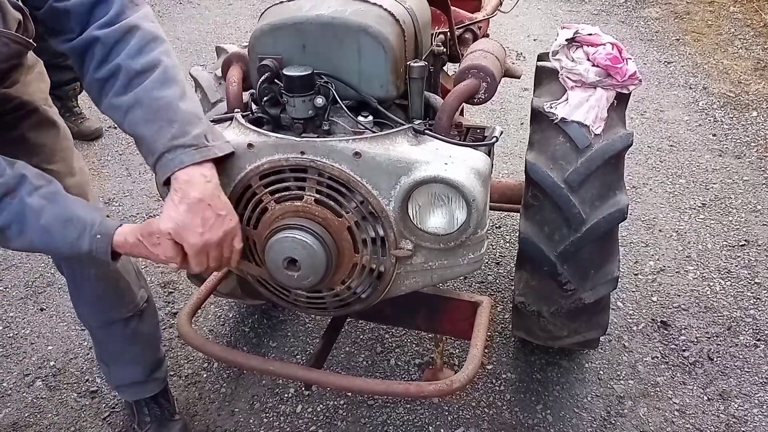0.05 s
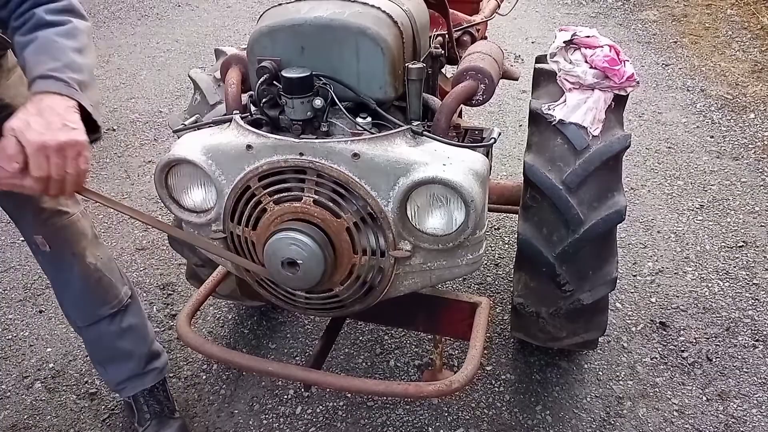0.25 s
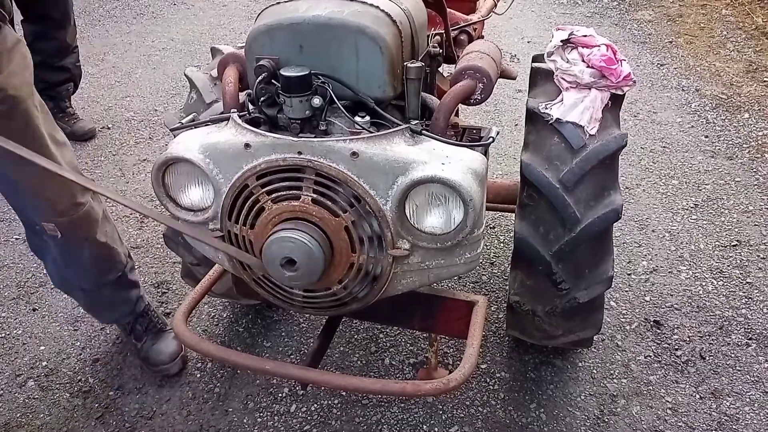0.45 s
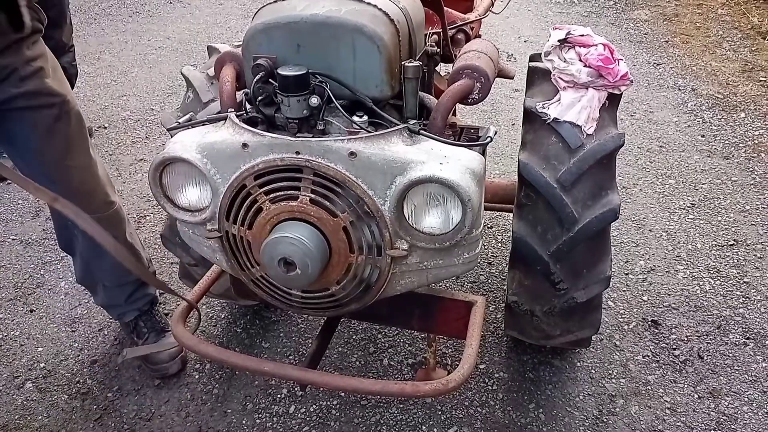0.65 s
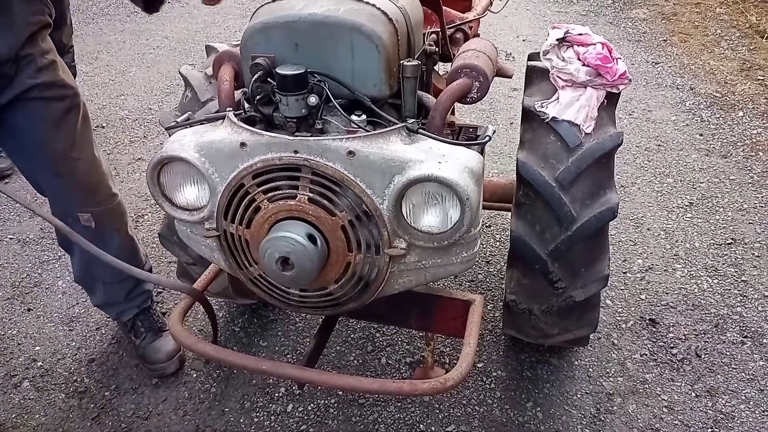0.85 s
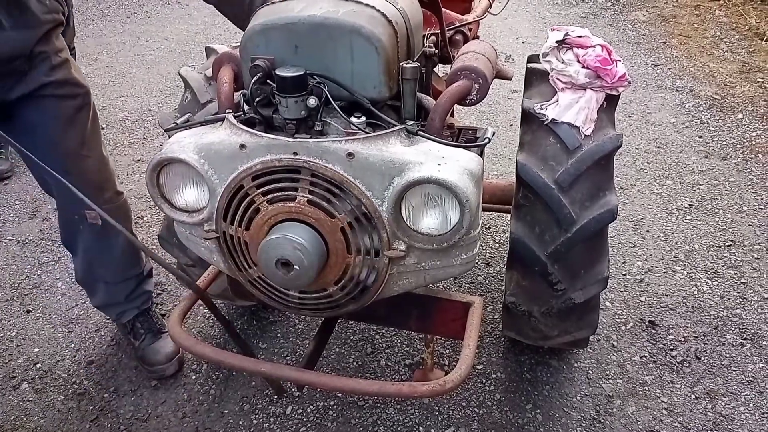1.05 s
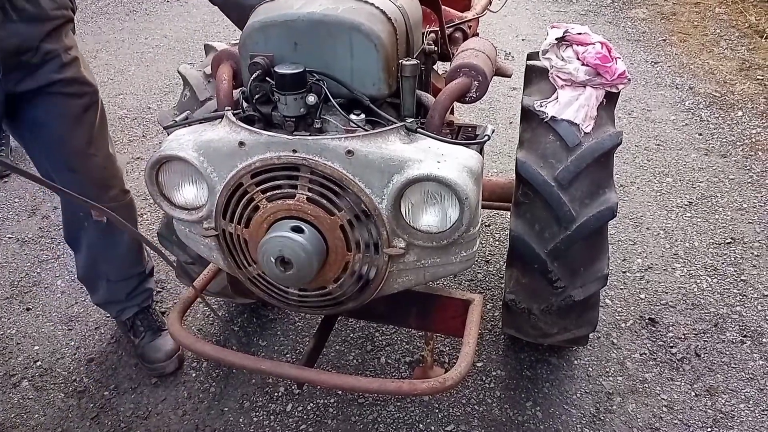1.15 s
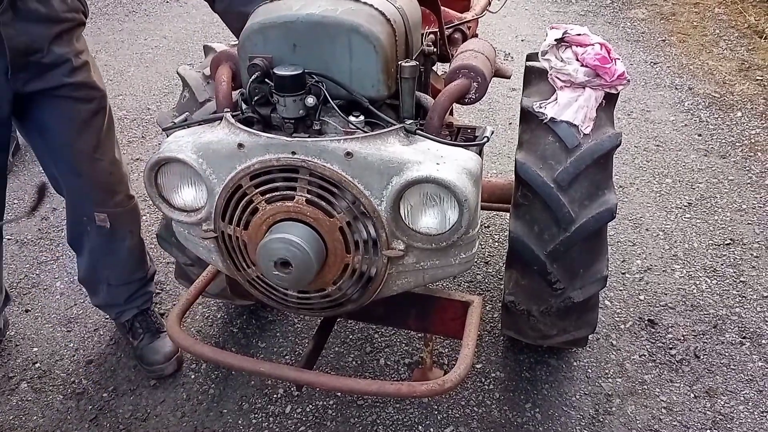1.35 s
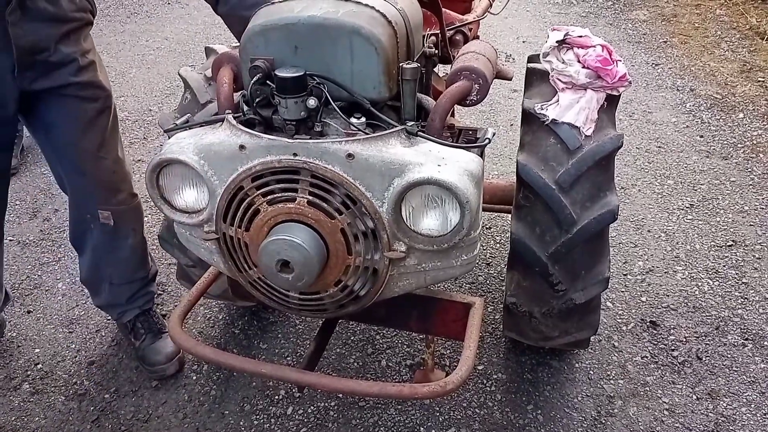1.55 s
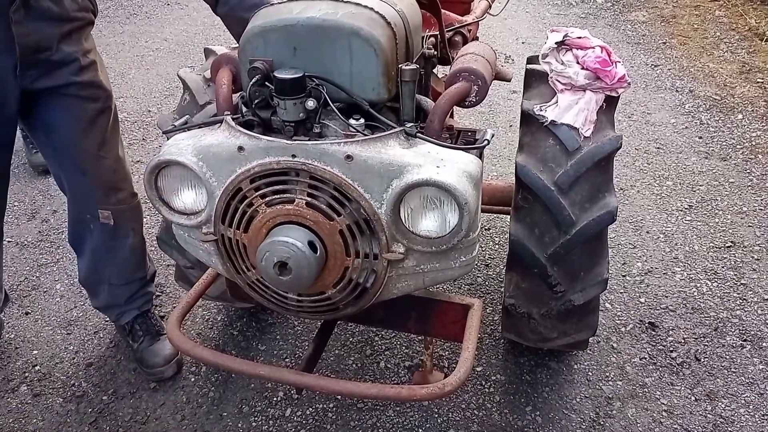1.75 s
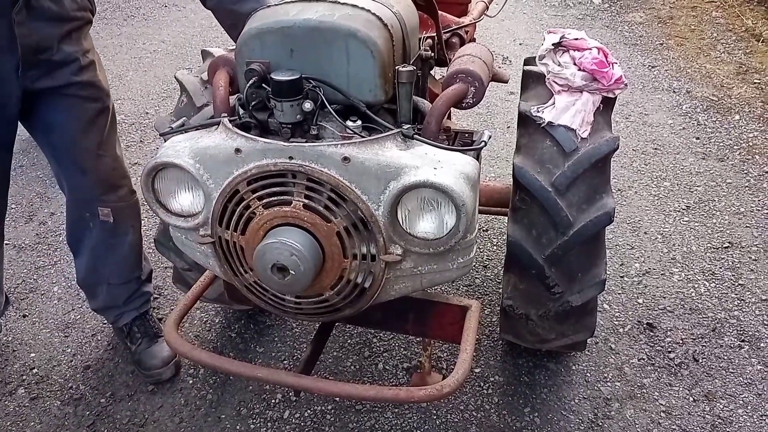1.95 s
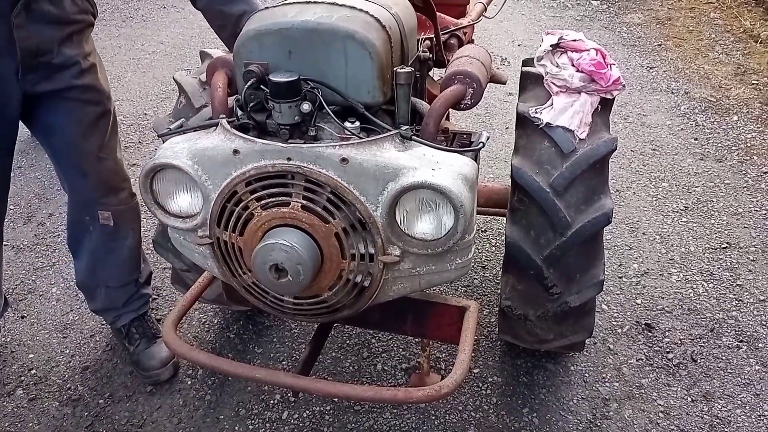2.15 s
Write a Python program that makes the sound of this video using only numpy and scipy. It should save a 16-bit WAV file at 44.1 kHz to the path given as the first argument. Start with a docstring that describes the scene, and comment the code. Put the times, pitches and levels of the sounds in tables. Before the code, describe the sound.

Close by in a quiet yard, an old tractor engine turns over without starting. A strap rubs and snaps loose, then gear clacks, air hisses and low exhaust puffs slow to a stop, with faint grit crunching.

```python
"""An old tractor engine, outdoors and close to the microphone, spun by a strap pulled off its pulley.
It coasts to rest without firing. Each piston stroke draws a hiss of air and puffs into the exhaust;
the gearing clacks between strokes. Gears and bearings rattle in the casing, loudest as the strap
whips free. Grit crunches nearby, as of boots on asphalt, and the casing hums as the engine stops.
The image is nearly mono, with short reflections from the yard and faint outdoor air behind."""
import sys
import numpy as np
from scipy import signal
from scipy.fft import rfft, irfft
from scipy.io import wavfile
from scipy.ndimage import uniform_filter1d

SR = 44100
rng = np.random.default_rng(int(sys.argv[2]) if len(sys.argv) > 2 else 0)


def wrap_up_sound(samples):
    """Save the sound to the file named by the first command line argument, as 16-bit audio."""
    columns = np.atleast_2d(samples).T
    # keep every value between -1 and 1, then stretch to whole-number steps
    tamed = np.clip(columns, -1, 1)
    steps = np.round(tamed * 32767).astype(np.int16)
    wavfile.write(sys.argv[1], SR, steps)


N = 97020

# Levels in a table are relative to its other rows.
# outdoor background: freq_hz, level_db
OUTDOOR_COLOUR = [(30, -13), (90, -4), (200, -3.5), (350, -28), (1000, -10), (3000, -11.5), (5500, -18),
                  (8500, -29), (11000, -19), (16000, -32)]
# course of the gear and bearing rattle: time_s, level_db
RATTLE_LEVELS = [(0, -70), (.10, -61), (.18, -46.5), (.26, -46.5), (.38, -39), (.49, -38), (.57, -30),
                 (.645, -35.5), (.70, -31), (0.788, -34.5), (.89, -37.5), (1.12, -39), (1.33, -42),
                 (1.385, -42.5), (1.43, -42), (1.521, -42.5), (1.64, -49), (1.92, -53), (1.99, -62.5),
                 (2.2, -61.5)]
# its spectrum: freq_hz, level_db
RATTLE_COLOUR = [(30, -42), (100, -2.5), (200, -6.5), (400, 1), (530, -2.5), (800, 0.5), (1100, -7),
                 (2200, -7.5), (3500, -13), (6000, -21), (8500, -41), (16000, -28.5)]
# modes of casing and cowl: pitch_hz, t60_s, level_db
CASING_MODES = [(217, 0.26, -9), (296, 0.16, -1), (386.7, 0.16, -5), (678.6, 0.11, -6), (849, 0.13, -5),
                (1013, 0.1, -14.5), (1226, 0.066, -7), (1464, 0.11, -6.5), (1603, 0.1, -6.5),
                (1728, 0.048, -10.5), (1812, 0.11, -4)]

# clacks of the gearing: start_s, level_db, brightness_db, decay_s
CLACKS = [(0.031, -56, -3, 0.012), (0.114, -63, -10, 0.022), (0.244, -42.5, -21, 0.021),
          (0.412, -41.5, 0.5, 0.027), (.537, -41, -16, 0.017), (0.664, -40.5, 0.5, 0.018),
          (0.764, -38, 0.5, 0.01), (0.904, -41, 0.5, 0.011), (.966, -41.5, -1, 0.0093),
          (1.051, -42.5, -4, 0.015), (1.225, -42, 2, 0.019), (1.4264, -37, 1.5, 0.022),
          (1.507, -43.5, -12, 0.0058), (1.691, -48, -19, 0.01), (1.7194, -42.5, 7, 0.027),
          (2.007, -61, -8, 0.017)]
# dull body of a clack: freq_hz, level_db
CLACK_BODY = [(100, -24), (300, -3.5), (480, 2), (700, 0.5), (1050, 0), (1350, -2.5), (2000, -8.5),
              (4000, -21), (16000, -36.5)]
# its bright edge: freq_hz, level_db
CLACK_BRIGHT = [(300, -25), (1350, -2.5), (1700, 1.5), (2100, 2), (2650, -4), (3100, -5), (3800, -8.5),
                (6500, -14.5), (8500, -51), (16000, -31)]
# hollow notes of the housing: pitch_hz, width_hz, level_db
HOUSING_PEAKS = [(712, 130, 4.5), (1180, 68, -5), (1760, 51, 7.5), (2250, 92, 11)]
# modes of the struck gear: pitch_hz, width_hz, level_db
GEAR_PEAKS = [(1745, 130, -4), (2540, 59, 7), (2630, 115, 8.5), (2730, 110, 8.5), (2840, 100, 2.5),
              (3480, 41, 6), (4205, 49, 12)]

# air drawn by the piston strokes: start_s, length_s, level_db
STROKES = [(0.097, 0.097, -48.5), (0.205, 0.19, -43), (0.401, 0.17, -41.5), (0.559, 0.13, -42),
           (0.657, 0.14, -40), (0.783, .12, -40.5), (0.9, 0.13, -42), (1.052, 0.13, -41),
           (1.212, 0.16, -42), (1.407, 0.18, -43.5), (1.703, .25, -44)]
# spectrum of the hiss: freq_hz, level_db
HISS_COLOUR = [(300, -19), (1500, -5), (2500, 2.5), (3800, -4.5), (5200, -2.5), (6600, 2.5), (7500, -4),
               (8500, -12), (9400, -2.5), (10300, -2), (11800, -2.5), (13400, -0.5), (15200, -6.5),
               (16000, 1)]
# resonances of the air passages: pitch_hz, width_hz, level_db
PASSAGE_PEAKS = [(3370, 110, 2.5), (4784, 93, 8), (5390, 150, 2.5), (5950, 165, 3), (6630, 35, 3),
                 (7400, 33, 6), (9930, 60, 8), (10650, 128, 9.5), (11560, 120, 3), (15100, 200, 13)]

# taut strap rubbing as it unwinds: start_s, length_s, level_db, pitch_hz, width_hz
RUBS = [(0.112, 0.073, -49, 1240, 900), (0.189, 0.13, -46.5, 860, 328), (0.325, 0.28, -42, 872, 232),
        (0.662, 0.055, -36, 776, 478)]
# strap scraping and whipping off: start_s, length_s, level_db
SCRAPES = [(.157, 0.031, -51), (.218, 0.051, -57), (.495, 0.043, -39), (.592, 0.03, -29.5),
           (.615, 0.02, -43), (.678, 0.0081, -45), (.755, 0.018, -39), (1.335, 0.03, -39.5)]
# spectrum of the scrapes: freq_hz, level_db
SCRAPE_COLOUR = [(200, -41), (1000, 5.5), (2500, 8.5), (4700, 7), (6700, 9), (8500, -6), (10800, 6.5),
                 (13200, -7.5), (15200, 10), (16000, -9)]
# crunches of grit: start_s, length_s, level_db
CRUNCHES = [(.220, 0.029, -40.5), (.410, 0.013, -39), (.662, 0.013, -37), (1.046, 0.013, -38.5),
            (1.585, 0.02, -46.5), (1.98, 0.021, -54.5), (2.006, 0.012, -48.5), (2.018, 0.025, -59),
            (2.055, 0.024, -55.5), (2.088, 0.013, -48.5), (2.122, 0.043, -53)]
# their spectrum: freq_hz, level_db
CRUNCH_COLOUR = [(300, -19), (1500, -16), (3400, -17), (4700, -1), (5800, -7), (7000, -14.5), (8500, -38.5),
                 (10800, -17), (13200, -23), (15200, -10), (16000, -4)]

# exhaust puffs: start_s, level_db, pitch_hz, overtone_db, tail_db
PUFFS = [(.318, -34.5, 83, -15, -31), (0.475, -33.5, 84, -10, -25), (.599, -26, 89.7, -6, -24),
         (0.712, -31, 96.1, -4.5, -32), (0.836, -30.5, 93.5, -8, -39), (.968, -32, 92.2, -7.5, -26),
         (1.119, -33.5, 86.7, -3.5, -38), (1.294, -35.5, 94, -8, -13), (1.511, -37.5, 81, -13, -39),
         (1.879, -48.5, 88.5, -9, -4.5)]
# turbulent exhaust gas: freq_hz, level_db
CHUFF_COLOUR = [(60, -29), (150, 2), (260, 1.5), (400, -6.5), (560, -5), (900, -7), (2000, -14),
                (6000, -44)]
# booms of the intake: start_s, level_db
BOOMS = [(0.537, -35), (0.653, -38), (0.765, -31), (1.047, -34.5)]

# casing hum as the engine stops: start_s, length_s, level_db
HUMS = [(1.86, 0.32, -63)]
# its low modes: pitch_hz, width_hz, level_db
HUM_PEAKS = [(387, 34, -2.5), (418, 24, -4.5)]
# soft scuffs: start_s, length_s, level_db
SCUFFS = [(2.15, 0.055, -61.5)]
# their broad bands: centre_hz, width_hz, level_db
SCUFF_PEAKS = [(284, 170, -0.5), (2200, 500, -3)]


def undb(db):
    return 10 ** (np.asarray(db) / 20)


def unit(x):
    return x / np.sqrt(np.mean(x ** 2))


def since(start):
    """Seconds since a moment, zero before it."""
    return np.maximum(np.arange(N) / SR - start, 0)


def fall(t, rise_s, decay_s):
    """Quick rise, exponential decay."""
    return (1 - np.exp(-t / rise_s)) * np.exp(-t / decay_s)


def swells(rows, shape):
    """One arch of level for each (start_s, length_s, level_db) row."""
    return sum(undb(db) * np.abs(np.sin(np.pi * np.minimum(since(start) / length, 1))) ** shape
               for start, length, db in rows)


def wander(per_s):
    """Slow random drift, spread near 1."""
    size = int(SR / per_s)
    steps = np.repeat(rng.standard_normal(N // size + 1), size)
    return 1.2 * uniform_filter1d(steps, size)[:N]


def grains(per_s, spread_db):
    """Dense tiny impacts of uneven size."""
    hits = rng.random(N) < per_s / SR
    signs = np.sign(rng.standard_normal(N))
    sizes = undb(spread_db * np.minimum(rng.exponential(size=N), 4))
    return unit(hits * signs * sizes)


def colour(x, points):
    """Minimum-phase filter of unit power shaped by (freq_hz, level_db) points."""
    hz, db = np.array(points, float).T
    size = 4096
    freqs = np.maximum(np.arange(size // 2 + 1) * SR / size, 1)
    cepstrum = irfft(np.log(undb(np.interp(np.log(freqs), np.log(hz), db))))
    cepstrum[1:size // 2] *= 2
    cepstrum[size // 2 + 1:] = 0
    impulse = irfft(np.exp(rfft(cepstrum)))
    return signal.fftconvolve(x, impulse / np.linalg.norm(impulse))[:N]


def resonate(x, peaks):
    """Sum of resonances from (pitch_hz, width_hz, level_db) rows."""
    return sum(undb(db) * signal.lfilter(*signal.iirpeak(hz, hz / width, fs=SR), x)
               for hz, width, db in peaks)


def bands(x, peaks):
    """Two passes through the resonances for steep skirts, at unit power."""
    return unit(resonate(resonate(x, peaks), peaks))


def reflections(x, decay_s):
    """A short cloud of echoes, starting 7 ms behind the direct sound."""
    echo = rng.standard_normal(N) * fall(since(0.00703), 0.0011, decay_s)
    return signal.fftconvolve(x, echo / np.linalg.norm(echo))[:N]


def outdoor_air():
    """Faint, steady background of the yard."""
    return undb(-66) * colour(rng.standard_normal(N), OUTDOOR_COLOUR)


def rattle():
    """Gears and bearings tick densely into the casing."""
    times, db = np.array(RATTLE_LEVELS).T
    ticks = grains(per_s=1800, spread_db=2) + undb(-5) * rng.standard_normal(N)
    level = undb(np.interp(since(0), times, db) - 5)
    return colour(ticks * level, RATTLE_COLOUR)


def casing(contact):
    """Contact sound plus the ringing it excites in casing and cowl."""
    out = contact
    for hz, t60, db in CASING_MODES:
        pole = np.exp((2j * np.pi * hz - np.log(1000) / t60) / SR)
        ring = 2 * (1 - abs(pole)) * signal.lfilter([1], [1, -pole], contact).real
        out = out + undb(db + 8) * ring
    return out


def gear_clacks():
    """Slack in the gearing closes with a blow and a fast, dying chatter; hard blows ring the gear."""
    rise_s, chatter_hz, bounces = 0.00182, 418.8, 40
    hardness = 2.14  # the gear's ring grows faster than the brightness of the blow
    body, bright, ring = np.zeros((3, N))
    for start, db, bright_db, decay_s in CLACKS:
        t = since(start)
        gaps_s = rng.uniform(0.5, 1.5, size=bounces) / chatter_hz
        bounce_s = start + rise_s + np.cumsum(gaps_s) - gaps_s[0]
        chatter = np.zeros(N)
        chatter[np.minimum(bounce_s * SR, N - 1).astype(int)] = rng.choice([-1, 1], size=bounces)
        drive = undb(-4.5) * np.sqrt(SR / chatter_hz) * chatter + undb(0.5) * rng.standard_normal(N)
        blow = drive * fall(t, rise_s, decay_s)
        dull_tail = undb(-10.5) * rng.standard_normal(N) * fall(t, decay_s, 0.048)
        body += undb(db) * (blow + dull_tail)
        bright += undb(db + bright_db) * blow
        ring += undb(db + hardness * bright_db - 7) * blow
    body = colour(body, CLACK_BODY)
    knock = body + resonate(body, HOUSING_PEAKS)
    edge = colour(bright, CLACK_BRIGHT)
    gear = resonate(colour(ring, CLACK_BRIGHT), GEAR_PEAKS)
    return undb(0.25) * knock + undb(-1.5) * edge + gear


def piston_hiss():
    """The moving piston draws air through a narrow gap, ringing passages that each waver in strength."""
    rise_s, fade_s, waver_db = 0.023, 0.059, 3
    speed = np.zeros(N)
    for start, length, db in STROKES:
        t = since(start)
        swell_db = 1.5 * np.sin(np.pi * np.minimum(t / length, 1)) ** 2  # fastest at mid-stroke
        late = np.maximum(t - length + fade_s, 0) / fade_s
        fade_db = -7 * np.minimum(late, 4) ** 2  # dies away towards dead centre
        speed += undb(db + swell_db + fade_db) * (1 - np.exp(-t / rise_s))
    flow = rng.standard_normal(N) + undb(-6) * grains(per_s=1500, spread_db=3.2)
    hiss = colour(flow * speed, HISS_COLOUR)
    passages = sum(resonate(hiss, [peak]) * undb(waver_db * wander(per_s=14)) for peak in PASSAGE_PEAKS)
    return undb(-3.5) * (hiss + passages)


def strap_rubs():
    """The strap sticks and slips on the pulley with a hollow rasp."""
    out = np.zeros(N)
    for start, length, db, hz, width in RUBS:
        slips = grains(per_s=900, spread_db=0.72)
        out += bands(slips, [(hz, width, 0)]) * swells([(start, length, db)], shape=0.42)
    return out


def strap_scrapes():
    """The strap scrapes and whips off in short, bright bursts of friction."""
    friction = grains(per_s=3700, spread_db=2.9) + 0.5 * rng.standard_normal(N)
    return colour(friction * swells(SCRAPES, shape=1), SCRAPE_COLOUR)


def grit_crunches():
    """Grit cracks in small dry grains, as under boots on asphalt."""
    grit = grains(per_s=2500, spread_db=0.95) + 0.5 * rng.standard_normal(N)
    return colour(grit * swells(CRUNCHES, shape=0.39), CRUNCH_COLOUR)


def exhaust_puffs():
    """Each puff swells as the valve opens and leaves the pipe humming at its pitch."""
    lead_s, open_s, decay_s, tail_s, overtone_ratio = 0.0039, 0.0093, 0.016, 0.105, 2.2
    out = np.zeros(N)
    for start, db, hz, overtone_db, tail_db in PUFFS:
        t = since(start - lead_s)
        phase = 2 * np.pi * hz * t
        tone = np.sin(phase) + undb(overtone_db) * np.sin(overtone_ratio * phase)
        opening = 1 - np.exp(-(t / open_s) ** 2)
        puff = tone * opening * np.exp(-t / decay_s)
        tail = undb(tail_db - 6) * np.sin(phase) * fall(t, decay_s, tail_s)
        out += undb(db + 7) * (puff + tail)
    return out


def exhaust_chuffs():
    """Turbulent gas gives each puff a throaty edge."""
    gas = sum(undb(db) * fall(since(start), rise_s=0.0029, decay_s=0.012) for start, db, *_ in PUFFS)
    return colour(gas * rng.standard_normal(N), CHUFF_COLOUR)


def intake_booms():
    """The fast strokes make the intake boom on one hollow note."""
    pitch_hz = 130.4
    out = np.zeros(N)
    for start, db in BOOMS:
        t = since(start)
        out += undb(db) * np.sin(2 * np.pi * pitch_hz * t) * fall(t, rise_s=0.0048, decay_s=0.036)
    return out


def casing_hum():
    """Low modes of the casing sound on faintly as the engine stops."""
    return bands(rng.standard_normal(N), HUM_PEAKS) * swells(HUMS, shape=0.28)


def scuffs():
    """A faint, dull rub, as of clothing, at the very end."""
    return bands(rng.standard_normal(N), SCUFF_PEAKS) * swells(SCUFFS, shape=0.5)


def scene():
    """Close to the engine in the yard; only the top of the treble differs between left and right."""
    low_cut = signal.butter(2, 50, "high", fs=SR, output="sos")
    top_only = signal.butter(6, 7000, "high", fs=SR, output="sos")
    pipes = signal.sosfilt(low_cut, exhaust_puffs() + intake_booms())
    engine = casing(rattle() + gear_clacks()) + piston_hiss() + pipes + exhaust_chuffs()
    near = engine + strap_scrapes() + strap_rubs() + casing_hum() + grit_crunches() + scuffs()
    mid = near + undb(-10.5) * reflections(near, decay_s=0.012) + outdoor_air()
    side = undb(-22) * signal.sosfilt(top_only, reflections(mid, decay_s=0.0009))
    return np.array([mid + side, mid - side])


def record(dry):
    """The recorder cuts the top steeply."""
    top_hz = 15720
    return signal.sosfilt(signal.ellip(10, 0.2, 80, top_hz, fs=SR, output="sos"), dry)


dry = scene()
out = record(dry)
wrap_up_sound(out)
```